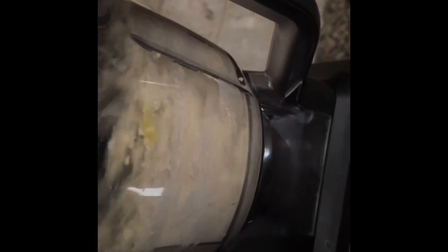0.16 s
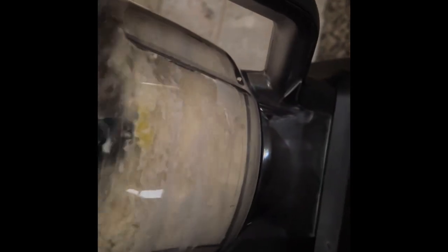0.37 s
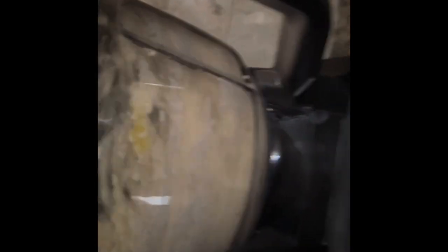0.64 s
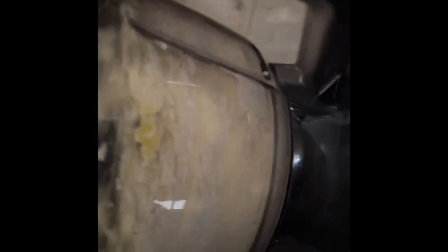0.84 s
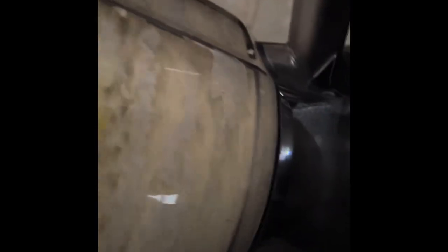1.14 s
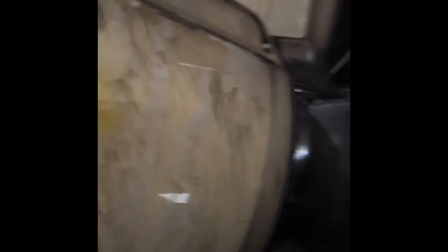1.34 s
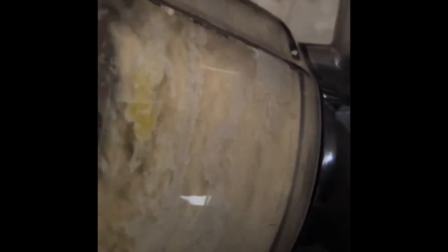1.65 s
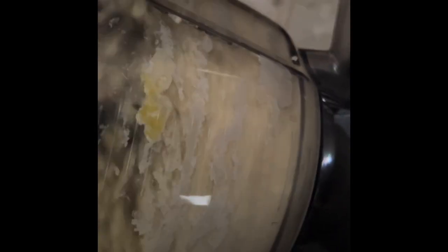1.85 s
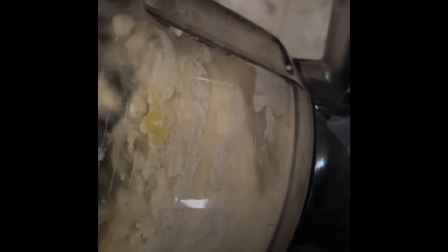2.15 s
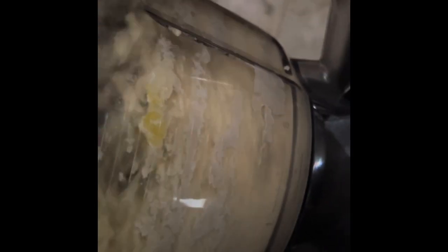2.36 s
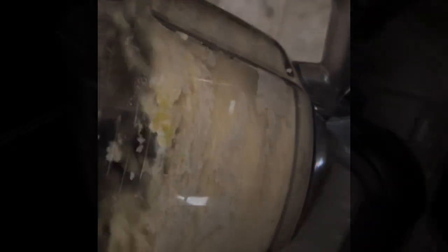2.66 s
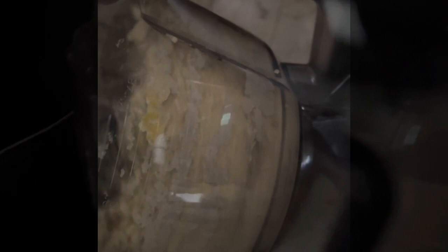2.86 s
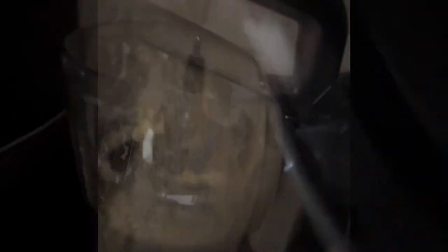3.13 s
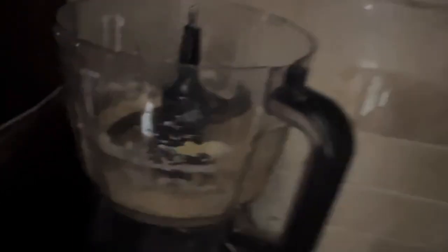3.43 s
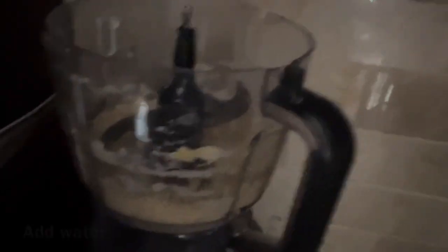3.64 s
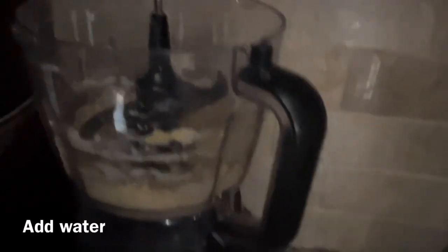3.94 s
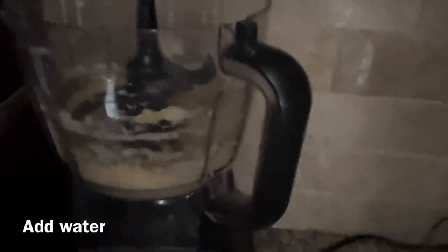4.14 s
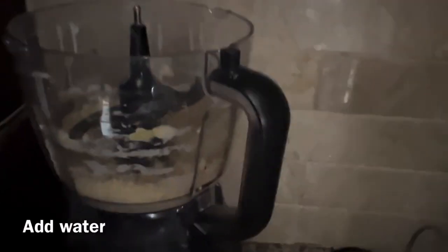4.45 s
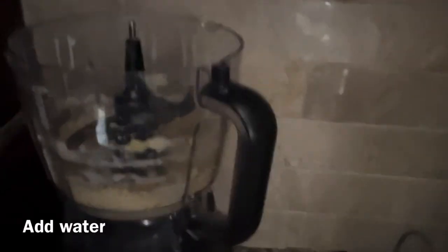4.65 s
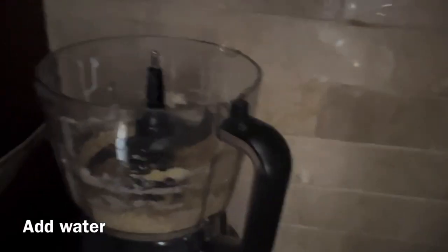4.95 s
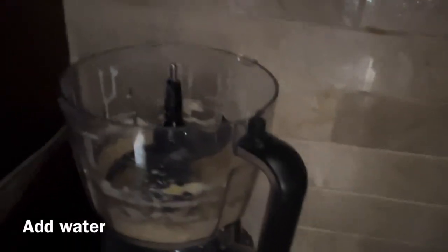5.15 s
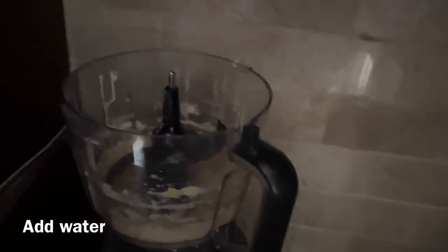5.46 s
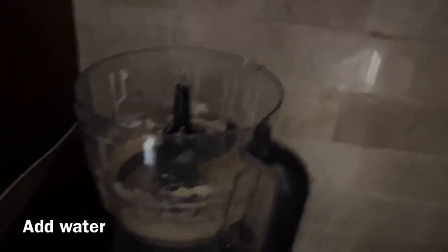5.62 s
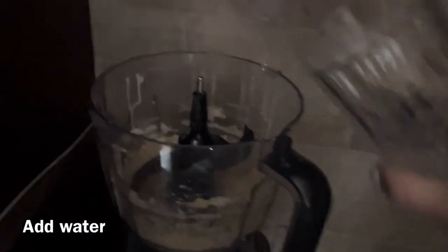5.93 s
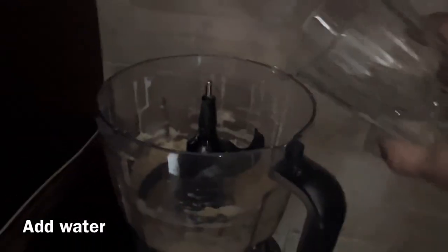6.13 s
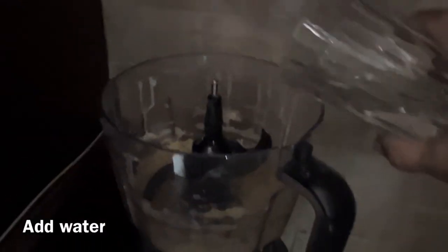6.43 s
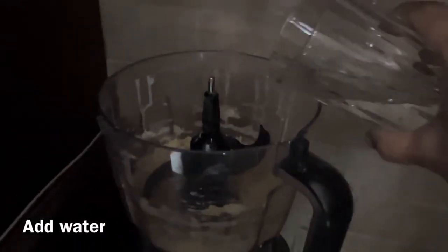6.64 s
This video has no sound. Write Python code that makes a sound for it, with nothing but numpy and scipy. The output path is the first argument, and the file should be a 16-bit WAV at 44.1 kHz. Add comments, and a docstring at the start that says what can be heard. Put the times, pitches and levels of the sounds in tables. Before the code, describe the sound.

Very close in a small hard-walled kitchen, a food processor kneads dough with a rough geared whine, pulsing quickly with each blade turn, with rushing fan air and rattling teeth. Around two and a half seconds it fades, the switch clacks and the motor winds down. Hard plastic lid and bowl knocks follow near four seconds, then faint bumps and quiet room hum with a distant motor drone.

```python
"""Close by in a small kitchen, a food processor kneads dough in low gear: its gears whine with a throb that
repeats on every turn of the blade, fan and brushes sing, teeth rattle, and dough rumbles in the plastic bowl.
From 2.4 s the machine fades while the room comes up; at 2.9 s the switch clacks and the motor coasts down.
Then plastic lid and bowl knock as decaying modes with noisy cracks, over a low hum, a distant drone and soft
room noise. Sines on one shaft angle make the machine's tones; shaped noise makes air and dough."""
import sys
import numpy as np
from scipy import signal
from scipy.fft import rfft, irfft, next_fast_len
from scipy.io import wavfile
from scipy.ndimage import uniform_filter1d, map_coordinates

SR = 44100
rng = np.random.default_rng(int(sys.argv[2]) if len(sys.argv) > 2 else 0)


def bounce(signal):
    """Save signal as a 16-bit WAV file at the path given by the first command-line argument."""
    frames = np.transpose(np.atleast_2d(signal))
    limited = np.clip(frames, -1, 1)
    pcm = np.round(limited * 32767).astype(np.int16)
    wavfile.write(sys.argv[1], SR, pcm)


N = 299439
TIME = np.arange(N) / SR  # s
FREQ = np.fft.rfftfreq(2 * next_fast_len(N // 2 + 1), 1 / SR) + 1e-3  # Hz, kept above zero for the logarithm
TOP_HZ = 15800
OFF_S = 2.92  # the motor loses its current
STIFF_TURNS_PER_S = 15.42  # blade shaft in stiff dough
PLAY_RATE = 22  # changes per second from play in gears and bearings
FLUTTERS_PER_S = 70  # quick flutter in the level of the tones

# How diffuse the room noise is. Each row: frequency in Hz, side minus mid in dB.
ROOM_WIDTH = [(60, -22), (110, -11.5), (200, -9.5), (380, -1.5), (700, 3), (1290, -1.5), (2380, 2.5),
              (4400, 0), (8120, 2), (15000, -5)]
# How diffuse knocks and switch ticks are. Each row: frequency in Hz, side minus mid in dB.
KNOCK_WIDTH = [(60, -26), (110, -23.5), (200, -14), (380, -6), (700, 2), (1290, 7), (2380, 0.5),
               (4400, -0.5), (8120, 1.5), (15000, -2)]
# Side level against mid in the machine's sound. Each row: frequency in Hz, side minus mid in dB.
SIDE_LEVEL = [(60, -40.5), (120, -22.5), (200, -23), (380, -15), (700, -0.5), (1290, -12.5), (2380, -10.5),
              (4400, 3.5), (8100, -10.5), (11500, 5.5), (13200, 35), (15500, 22.5)]


def undb(db):
    """Decibels to gain."""
    return 10 ** (np.asarray(db) / 20)


def unit(x):
    """Scale to rms 1."""
    return x / np.sqrt(np.mean(x ** 2))


def slope(points):
    """(Hz, dB) points joined on a log-frequency axis."""
    hz, db = np.transpose(points)
    return np.interp(np.log(FREQ), np.log(hz), db)


def colour(x, db):
    """Filter by a gain in dB at every frequency."""
    spectrum = rfft(x, 2 * len(FREQ) - 2)
    return irfft(spectrum * undb(db))[..., :N]


def pan(db):
    """Left and right gains for a level difference, left minus right."""
    return undb(np.array([[1], [-1]]) * db / 2)


def stereo(pair, db, width):
    """Colour two unrelated signals as mid (rms 1) and side; the width sets the side's share."""
    mid, side = colour(pair, np.array([db, db + slope(width)]))
    return np.array([mid + side, mid - side]) / np.std(mid)


def noise():
    """Two unrelated white noises."""
    return rng.standard_normal((2, N))


def walk(rate):
    """Smooth random wander with rms 1, changing direction about rate times a second."""
    k = int(SR / rate)
    steps = np.repeat(rng.standard_normal(N // k + 1), k)[:N]
    return unit(uniform_filter1d(steps, k))


def tone(cycles, wander_db, lead=0, rate=9):
    """A sine of rms 1 before its level wanders; the left ear leads by some radians."""
    start = rng.random()
    phase = 2 * np.pi * ((cycles + start) % 1) + np.array([[lead], [-lead]]) / 2
    return np.sqrt(2) * np.sin(phase.astype(np.float32)) * undb(wander_db * walk(rate))


def stir(hz):
    """A soft band of room noise around a centre."""
    # Band shape. Each row: multiple of the centre frequency, level in dB.
    stir_shape = [(.35, -35.5), (.75, -11), (1, 2.5), (1.25, -19), (2.6, -38), (8, -60)]
    return stereo(noise(), slope([(hz * k, db) for k, db in stir_shape]), ROOM_WIDTH)


def midrange_stirs():
    """A steady faint midrange noise, with bands that swell and ebb as bell curves in time."""
    # Swells in the room noise. Each row: middle in seconds, length in seconds, level in dB, centre in Hz.
    stir_swells = [(5.45, 0.31, -86.5, 1000), (5.96, .16, -86, 1480), (6.137, 0.087, -82, 1100),
                   (6.65, 0.24, -78, 1100)]
    swell = sum(undb(db) * np.exp(-(2 * (TIME - s) / length) ** 2) * stir(hz)
                for s, length, db, hz in stir_swells)
    return undb(-87) * stir(1080) + swell


def distant_drone():
    """A distant appliance motor hums on a few slightly unsteady sines."""
    # Motor tones. Each row: frequency in Hz, level in dB.
    drone_tones = [(153.5, -68.5), (188.4, -68), (376.8, -71.5), (424, -80), (447, -80), (516.5, -77)]
    return sum(undb(db) * tone(hz * TIME + .08 * walk(2.6), wander_db=1.5) for hz, db in drone_tones)


def kitchen():
    """A low hum and a distant appliance's drone in soft room noise with faint midrange swells."""
    # Colour of the room noise. Each row: frequency in Hz, relative level in dB.
    room_colour = [(20, -46), (47, -23), (80, -7.5), (119, -15.5), (158, -10.5), (197, -19), (225, -27),
                   (257, -23.5), (314, -26), (374, -24), (521, -30.5), (594, -37), (1010, -46), (1600, -54)]
    # Faint hiss above it. Each row: frequency in Hz, relative level in dB.
    hiss_colour = [(3000, -59), (4930, -62.5), (15500, -68)]
    room_db, hum_hz, hum_db = -54.5, 58.8, 5  # the hum's level is relative to the room noise
    hum = undb(hum_db) * tone(hum_hz * TIME + .04 * walk(9), wander_db=1)
    air = stereo(noise(), slope(room_colour + hiss_colour), ROOM_WIDTH) * undb(0.66 * walk(3.5))
    return undb(room_db) * (hum + air) + distant_drone() + midrange_stirs()


def tiled_walls(x, t60=0.3, wet_db=-16.0):
    """A dense tail of reflections, different at each ear; wet_db applies before its colour."""
    t = TIME[:SR]
    first_return = t > .006  # s
    tail = rng.standard_normal((2, len(t))) * undb(-60 * t / t60) * first_return
    tail /= np.sqrt(np.sum(tail ** 2, axis=1, keepdims=True))
    wet = signal.fftconvolve(x, tail, axes=1)[:, :N]
    wall_db = slope([(90, -14.0), (350, 3.5), (550, 6), (850, 4.5), (1200, 9.5), (6000, 6.0), (12000, 1)])
    return undb(wet_db) * colour(wet, wall_db)


def rings(rows):
    """Half a second of each mode: bass builds later, and neighbours start in opposite directions."""
    t = TIME[:SR // 2]
    shapes = []
    for k, (hz, t60, *_, pan_db) in enumerate(rows):
        envelope = undb(-60 * t / t60) * (1 - np.exp(-hz * t / 1.2))
        shapes.append((-1) ** k * envelope * np.sin(2 * np.pi * hz * t) * pan(pan_db))
    return np.array(shapes)


def contact(build_s):
    """Envelope of a crack: a contact that builds slowly also scrapes for longer before it dies away."""
    t = TIME[:SR // 2]
    t60 = 0.04 + 2.5 * build_s  # s
    return undb(-60 * np.maximum(t - build_s, 0) / t60) * np.minimum(t / build_s, 1)


def knocks():
    """Each blow rings its own mix of the bowl's modes with a gritty plastic crack, its treble cut to suit."""
    # Bowl and base. Each row: frequency in Hz, t60 in seconds, relative level in dB struck at the lid,
    # relative level in dB struck low down, left minus right in dB.
    bowl_modes = [(79.3, 0.49, -32.5, -17, 0), (93.5, 0.32, -18, -20.5, 1), (147, 0.27, -22.5, -26, 1.5),
                  (195, 0.233, -21, -27, 6), (224, 0.087, -24, -16, 5.5), (292.5, .2, -19, -23, 7),
                  (373, 0.028, -30, -1, 4.5), (439, 0.043, -29, 1, 5), (512, 0.12, -19, -21.5, 5.5),
                  (547, 0.16, -17, -21.5, 3.5), (666, 0.063, -9.5, -24.5, 0), (750, 0.08, -9.5, -29, -1.5),
                  (834, 0.058, -7, -38.5, -13.5), (927, 0.048, -9.5, -41, -3), (1050, .04, -20.5, -31, 3),
                  (1146, 0.05, -20, -20.5, -6.5), (1440, .045, -22.5, -30, 3),
                  (1583, 0.051, -24, -38.5, -2.5), (1850, .04, -23, -26, 2.5),
                  (1936, 0.056, -23.5, -32.5, 4.5), (2165, 0.029, -31.5, -26.5, 1.5),
                  (2520, .05, -21, -36, 6.5), (2600, 0.034, -20.5, -31.5, 0.5),
                  (2713, .035, -30, -41, -8.5), (3240, .04, -25.5, -50.5, -1),
                  (3340, 0.037, -25.5, -47, -0.5), (4480, .035, -41.5, -56, 2),
                  (4870, .06, -35.5, -51, -0.5)]
    # Lid and bowl blows. Each row: start in seconds, ring in dB, place from 0 (low) to 1 (lid),
    # crack in dB over the grit, time the contact builds in seconds, low-pass edge in Hz.
    blow_rows = [(3.7831, -4.5, 0.99, -21, 0.0027, 11500), (3.7916, -14, 0.51, -26, 0.0014, 10030),
                 (3.7975, -30, .9, -30.5, .0006, 7000), (3.8155, -27.5, .35, -43, .0008, 9000),
                 (3.8284, -16, .5, -26, .0012, 8080), (3.946, -11.5, 0.033, -34, 0.002, 11000),
                 (3.955, -29, .1, -41, 0.0013, 10000), (4.039, -52, 0.22, -48.5, .003, 10000),
                 (4.0601, -58, 0.22, -38.5, 0.0013, 11000), (4.063, -27.5, 0.019, -71, .002, 900),
                 (4.107, -64, .2, -55, 0.0044, 14000), (4.143, -64, .2, -51, 0.0027, 14000),
                 (4.168, -49, 0.54, -47.5, 0.0083, 3500), (4.205, -57, .5, -61.5, .006, 3000),
                 (4.267, -44, 0.033, -63, 0.0087, 2515), (4.413, -66.5, 0.46, -57.5, 0.0053, 4980),
                 (4.44, -70, 0.46, -63.5, 0.017, 6000), (4.471, -50.5, 0.33, -61, 0.004, 2980),
                 (4.551, -44, 0.017, -78, 0.0042, 1500), (4.668, -63, .6, -70, 0.0034, 2980),
                 (4.805, -60, 0.63, -67, 0.018, 2510), (4.901, -49.5, 0.32, -67, 0.02, 2500),
                 (5.102, -62, 0.35, -65, 0.005, 6980)]
    # Colour of the crack. Each row: frequency in Hz, relative level in dB.
    crack_colour = [(80, -22.5), (400, 9.5), (1000, -0.5), (2600, -4.5), (4000, -8), (5500, -9.5),
                    (8300, -16), (9600, -27), (11500, -9), (15500, -22.5)]
    scatter_db = 3.5  # at the highest mode; lower modes differ less from blow to blow
    out, shapes = np.zeros((2, N)), rings(bowl_modes)
    grit = undb(-4.5 + 2.0 * walk(700)) * stereo(noise(), slope(crack_colour), KNOCK_WIDTH)
    hz, _, lid_db, low_db, _ = np.transpose(bowl_modes)
    scatter = rng.standard_normal((len(blow_rows), len(bowl_modes))) * scatter_db * hz / hz.max()
    for (s, ring_db, place, crack_db, build_s, top_hz), extra_db in zip(blow_rows, scatter):
        span = slice(int(s * SR), int(s * SR) + SR // 2)
        place = np.clip(place, 0, 1)
        sizes = (place * undb(lid_db) + (1 - place) * undb(low_db)) * undb(ring_db + extra_db)
        ring = np.tensordot(sizes, shapes, 1)
        crack = undb(crack_db) * contact(build_s) * grit[:, span]
        low_pass = signal.butter(2, min(top_hz, TOP_HZ), fs=SR, output="sos")
        out[:, span] += signal.sosfilt(low_pass, ring + crack)
    return out


def switch():
    """The switch snaps back and chatters: bright ticks that thump the motor base."""
    # Motor base under the switch. Each row: frequency in Hz, t60 in seconds, relative level in dB,
    # left minus right in dB.
    base_modes = [(515, 0.083, -12, 12), (613, 0.091, -2.5, -3.5), (676, 0.061, -1, -5),
                  (757, 0.086, -7, -3), (860, 0.081, -1.5, -6)]
    # Snap and chatter. Each row: start in seconds, thump in dB, tick in dB.
    click_rows = [(2.858, -19.5, -22), (2.875, -22.5, -27), (2.892, -24.5, -31)]
    # Colour of the tick. Each row: frequency in Hz, relative level in dB.
    tick_colour = [(300, -12), (800, 0), (1600, -5), (2800, 0.5), (5000, -8), (9000, -10), (13000, -6),
                   (15500, -22.5)]
    build_s = 0.00105
    out = np.zeros((2, N))
    thump = np.tensordot(undb(np.transpose(base_modes)[2]), rings(base_modes), 1)
    grit = stereo(noise(), slope(tick_colour), KNOCK_WIDTH)
    for s, thump_db, tick_db in click_rows:
        span = slice(int(s * SR), int(s * SR) + SR // 2)
        out[:, span] += undb(thump_db) * thump + undb(tick_db) * contact(build_s) * grit[:, span]
    return out


def dough():
    """The dough tumbles in uneven lumps against the bowl wall, which booms: low noise of wandering level."""
    # Boom of the bowl wall. Each row: frequency in Hz, relative level in dB.
    dough_colour = [(30, -45.5), (65, -16.5), (110, -19.5), (135, -5), (160, -0.5), (190, 2), (230, -6),
                    (300, -6.5), (420, -26), (800, -66.5)]
    lumps_per_s, lumps_db = 9, 0.66
    return stereo(noise(), slope(dough_colour), SIDE_LEVEL) * undb(lumps_db * walk(lumps_per_s))


def panels():
    """The housing's resonances, in dB at every frequency."""
    # Each row: centre in Hz, width (standard deviation) in Hz, gain in dB.
    panel_rows = [(587, 77, 3), (854, 34, 5.5), (1130, 90, 7), (1400, 39, 6.5), (1634, 100, 12.5),
                  (2093, 190, 9), (2418, 50, 9), (2720, 43, 6), (3340, 55, 6.5), (3700, 40, 2),
                  (4116, 110, 6), (4780, 67, -6)]
    return sum(db * np.exp(-((FREQ - hz) / width) ** 2 / 2) for hz, width, db in panel_rows)


def noise_colour():
    """Colour of the noise as heard, rolled off steeply above 11 kHz, with the housing's resonances, in dB."""
    # Colour without the resonances. Each row: frequency in Hz, relative level in dB.
    heard_colour = [(60, -43.5), (250, -6.5), (330, 3), (440, -5.5), (560, 1.5), (1000, -3), (1900, -7.5),
                    (2900, 2.5), (3600, -8), (6300, -6), (8300, -8), (9700, -14), (11200, -13.5),
                    (12200, -29.5), (13200, -55.5)]
    return slope(heard_colour) + panels()


def swells():
    """Extra dB on fan, whistle, upper whistle and gear whine: each change comes in, holds and goes."""
    # Swells and dips of the tones. Each row: middle in seconds, length in seconds, fan in dB,
    # whistle in dB, upper whistle in dB, gear whine in dB.
    swell_rows = [(.56, 0.4, 6.5, 0.5, -1.5, -0.5), (1.01, 0.33, 3.5, 10, 1.5, 0.3),
                  (1.386, 0.73, 1.9, -3, 12.5, 1.2), (2.02, 0.16, 3, 7, -3, -1),
                  (2.32, 0.37, 4, 3.5, 0.5, -1.5), (2.71, 0.53, 6, -2, 7, -1)]
    edge_s = .14
    return sum(np.outer(dbs, np.clip((length / 2 - np.abs(TIME - s)) / edge_s + .5, 0, 1))
               for s, length, *dbs in swell_rows)


def motor(turn):
    """The fan blades sing and the brushes whistle over the commutator bars, all locked to the shaft."""
    fan_order, commutator_order = 195, 180  # cycles per turn
    fan_play, brush_play = 0.033, .035  # cycles of phase
    # base levels in dB, to which swells and resonances add
    fan_base_db, overtone_db, whistle_base_db, upper_base_db = -38.5, -54, -45, -57
    brush_sink_db_per_s = 30  # the brushes' whistle dies quickly once the current is off
    fan_db, whistle_db, upper_db, _ = swells()
    blades = fan_order * turn + fan_play * walk(PLAY_RATE)
    fan = undb(fan_base_db + fan_db) * tone(blades, wander_db=2, lead=-.6, rate=FLUTTERS_PER_S)
    fan = colour(fan, panels())
    overtone = undb(overtone_db) * tone(2 * blades, wander_db=1)
    bars = commutator_order * turn
    whistle = tone(2 * bars + brush_play * walk(PLAY_RATE), wander_db=2, lead=-.4, rate=FLUTTERS_PER_S)
    upper = tone(3 * bars, wander_db=1.2) + undb(-8) * tone(4 * bars, wander_db=2)
    brushes = undb(whistle_base_db + whistle_db) * whistle + undb(upper_base_db + upper_db) * upper
    return fan + overtone + brushes * undb(-brush_sink_db_per_s * np.maximum(TIME - OFF_S, 0))


def near_surfaces(x):
    """Worktop and wall mirror the sound; the hand-held phone drifts, so the comb pattern shifts."""
    # Reflections. Each row: lag in seconds, level in dB relative to the direct sound.
    mirror_rows = [(.0023, -11.5), (.0052, -10.5), (.0087, -10)]
    drift_s, drifts_per_s = .00002, 1.5
    out = x.copy()
    for lag_s, db in mirror_rows:
        late = TIME - lag_s - drift_s * walk(drifts_per_s)
        out += undb(db) * np.array([np.interp(late, TIME, side) for side in x])
    return out / np.sqrt(1 + sum(undb(db) ** 2 for _, db in mirror_rows))


def air_rush():
    """The fan's rush of air: coloured noise, combed by nearby surfaces."""
    return near_surfaces(stereo(noise(), noise_colour(), SIDE_LEVEL)) * undb(.5 * walk(25))


def load(turn):
    """Whine level and mesh load (dB) as the blades drag through the dough three times on every turn."""
    # Bites. Each row: place in the turn, width (standard deviation) as a share of a turn,
    # whine rise in dB, mesh load in dB before mesh tones and rattle each take their share.
    bite_rows = [(.13, .105, 9.5, -8), (.61, .1, 14.5, 8), (.845, .065, 11, 4)]
    slack_whine_db, slack_mesh_db = -16.6, 1  # between bites
    scatter, changes_per_s = 0.033, 45  # bites vary by this share of their depth
    bites = 0
    for place, width, *dbs in bite_rows:
        from_middle = (turn - place + .5) % 1 - .5
        bites = bites + np.outer(dbs, np.exp(-(from_middle / width) ** 2 / 2))
    bites = bites * (1 + scatter * walk(changes_per_s))
    return slack_whine_db + bites[0], slack_mesh_db + bites[1]


def gear_whine(turn, whine_db, halvings):
    """A whine whose phase sways: an off-centre gear runs ahead, then behind, on every turn."""
    whine_order, sway_cycles = 87, .13
    sink_db = -3.5  # per halving of speed, added to that of all the gears
    sway = sway_cycles * np.cos(2 * np.pi * (turn - .12))
    level_db = whine_db + swells()[3] - sink_db * halvings
    return undb(level_db) * tone(whine_order * turn + sway, wander_db=1, lead=.1, rate=FLUTTERS_PER_S)


def gear_mesh(turn, mesh_db):
    """Mesh tones follow the load and swell as they pass through resonances of the housing."""
    # Tooth meshing: cycles per turn of each tone.
    mesh_orders = [15, 21, 36, 44, 46, 66, 80, 108, 117, 132, 155, 176]
    # Level of each tone in dB relative to the gears, before load and resonances.
    mesh_levels = [-19, -22.5, -26, -17.5, -23, -27, -26.5, -30.5, -28, -28, -31.5, -25]
    play = 0.076  # cycles of phase
    mesh = 0
    for order, db in zip(mesh_orders, mesh_levels):
        cycles = order * turn + play * walk(PLAY_RATE)
        mesh = mesh + undb(db) * tone(cycles, wander_db=-1.5, lead=rng.normal(0, 0.25))
    return colour(mesh * undb(0.35 * mesh_db), panels())


def tooth_pattern(turn):
    """Uneven tooth flanks: two rough patterns that repeat on every turn."""
    flanks = rng.standard_normal((2, 3072))
    return np.array([map_coordinates(f, [turn % 1 * len(f)], order=3, mode="grid-wrap") for f in flanks])


def tooth_rattle(turn, mesh_db):
    """The teeth rattle in a pattern that repeats each turn, shifts slowly and swells with the load."""
    shift = .8 * walk(4)  # radians between two patterns
    rattle = np.cos(shift) * tooth_pattern(turn) + np.sin(shift) * tooth_pattern(turn)
    rattle = rattle * undb(0.21 * mesh_db + 2.0 * walk(60))
    # the teeth fill the middle range; the rush of air takes over in the treble
    middle = slope([(200, -11.0), (550, 4.0), (2800, -2.0), (6000, -2.0), (11000, -8.0)])
    return stereo(rattle, noise_colour() + middle, SIDE_LEVEL)


def gears(turn, halvings):
    """Whine, mesh tones and rattle under the load of every turn, with the fan's rush of air."""
    whine_db, mesh_db = load(turn)
    tones = gear_whine(turn, whine_db, halvings) + gear_mesh(turn, mesh_db)
    return tones + undb(-1.5) * tooth_rattle(turn, mesh_db) + undb(-3.5) * air_rush()


def shaft_speed():
    """Turns per second: nearly steady, easing up as the dough loosens, then coasting down."""
    loose_turns_per_s, loosens_from_s, loosens_to_s = 15.65, .95, 3.05
    coast_loss, coast_power = 9.2, 1.135  # turns per second lost after 1 s; power of time the loss follows
    loose = np.clip((TIME - loosens_from_s) / (loosens_to_s - loosens_from_s), 0, 1)
    gain = (loose_turns_per_s - STIFF_TURNS_PER_S) * np.sin(np.pi / 2 * loose) ** 2
    lost = coast_loss * np.maximum(TIME - OFF_S, 0) ** coast_power
    return np.maximum(STIFF_TURNS_PER_S + gain - lost, 1)


def food_processor():
    """One shaft angle drives the gears and motor; every sound sinks as the shaft slows."""
    # How far the machine leans left. Each row: frequency in Hz, left minus right in dB.
    lean_left = [(60, 1), (200, 1), (700, 5), (1400, 1), (8000, 0)]
    gears_db, dough_db = -22.5, -30  # base levels at full speed
    gears_sink_db, motor_sink_db, dough_sink_db = 14.5, 13, 17.5  # dB per halving of speed
    speed = shaft_speed()
    turn = np.cumsum(speed) / SR + 0.00011 * walk(25)  # the dough tugs at the shaft
    halvings = np.maximum(np.log2(STIFF_TURNS_PER_S / speed), 0)
    machine = (undb(gears_db - gears_sink_db * halvings) * gears(turn, halvings)
               + undb(-motor_sink_db * halvings) * motor(turn)
               + undb(dough_db - dough_sink_db * halvings) * dough())
    return colour(machine, np.outer([1, -1], slope(lean_left)) / 2)


def scene():
    """The machine fades out in a straight line as the kitchen fades in; blows echo off the walls."""
    fade_end_s, fade_length_s = 3.464, 1.1
    room_share = .09  # gain of the room noise before the fade
    fade = np.clip((fade_end_s - TIME) / fade_length_s, 0, 1)
    blows = switch() + knocks()
    room = (1 - fade + room_share * fade) * kitchen()
    return fade * food_processor() + blows + tiled_walls(blows) + room


def record(dry):
    """The phone cuts the top with a steep low-pass."""
    return signal.sosfilt(signal.ellip(8, .2, 70, TOP_HZ, fs=SR, output="sos"), dry)


dry = scene()
out = record(dry)
bounce(out)
```